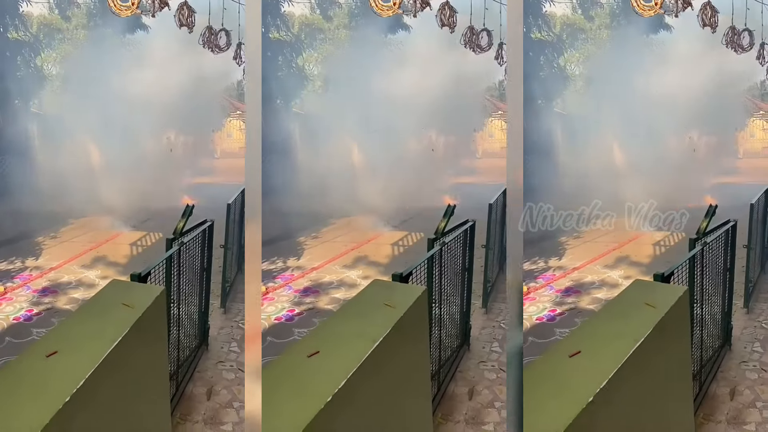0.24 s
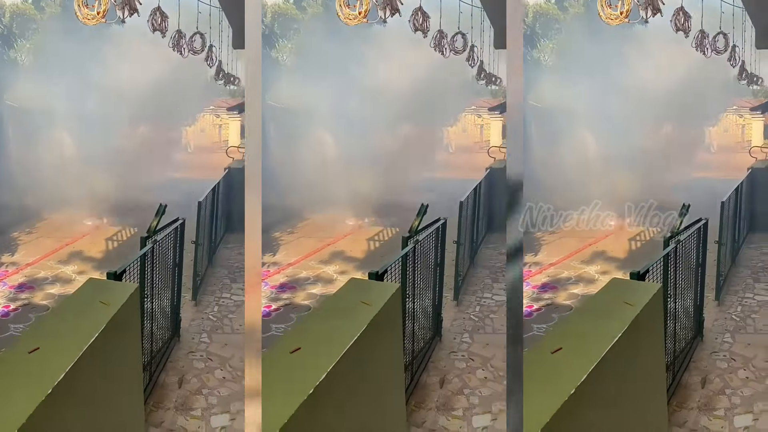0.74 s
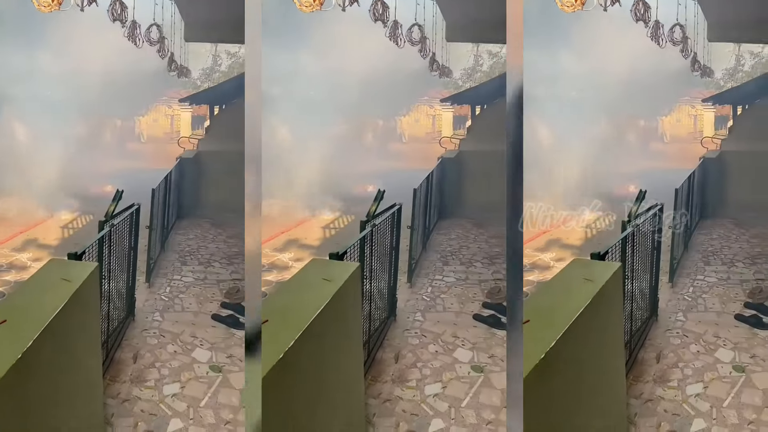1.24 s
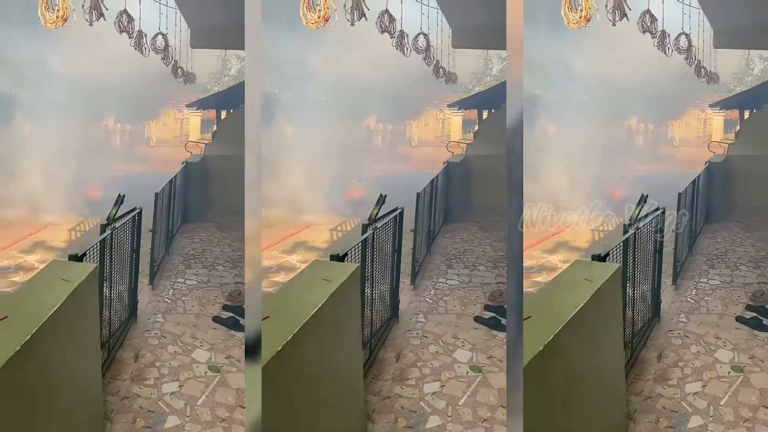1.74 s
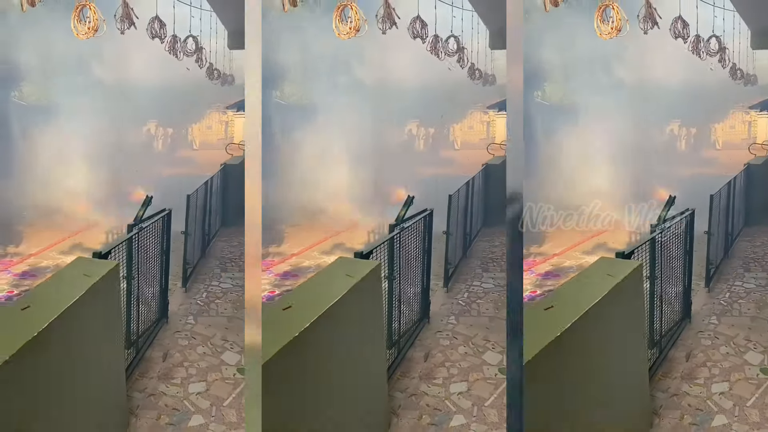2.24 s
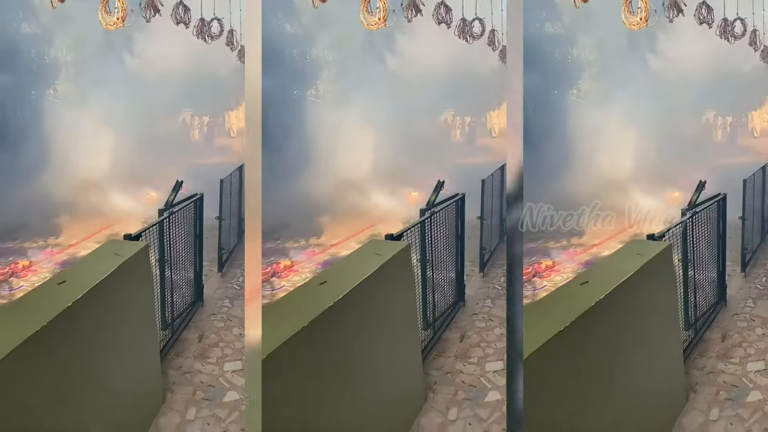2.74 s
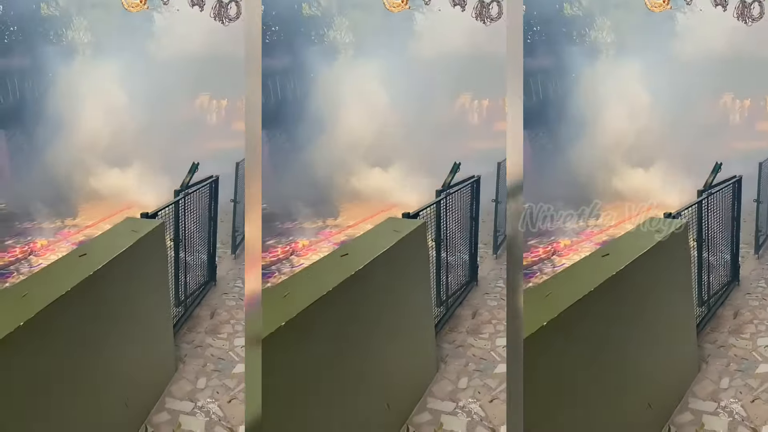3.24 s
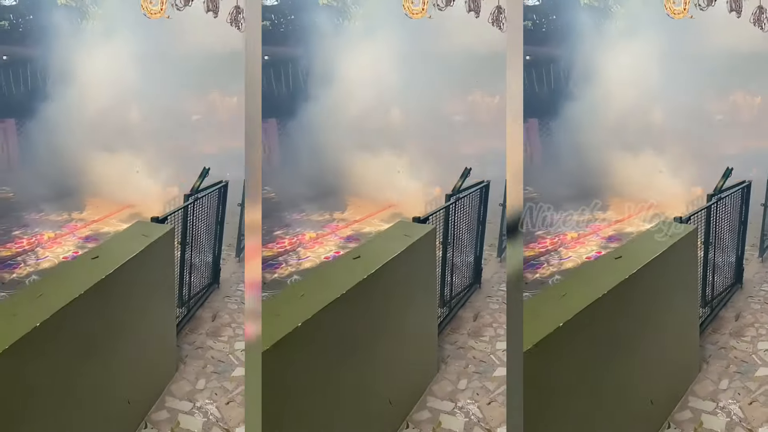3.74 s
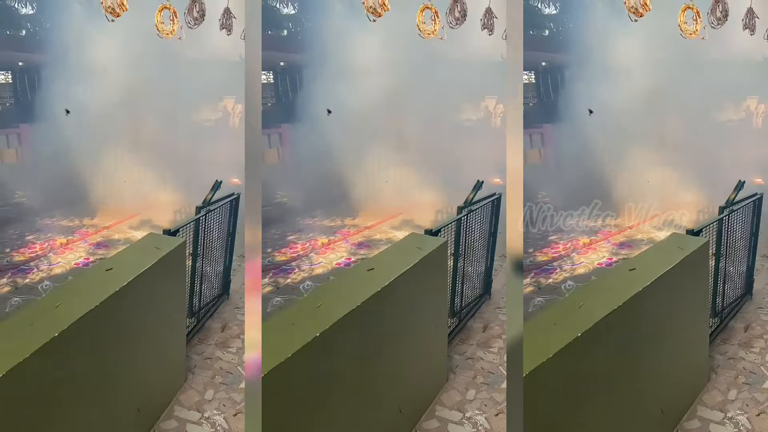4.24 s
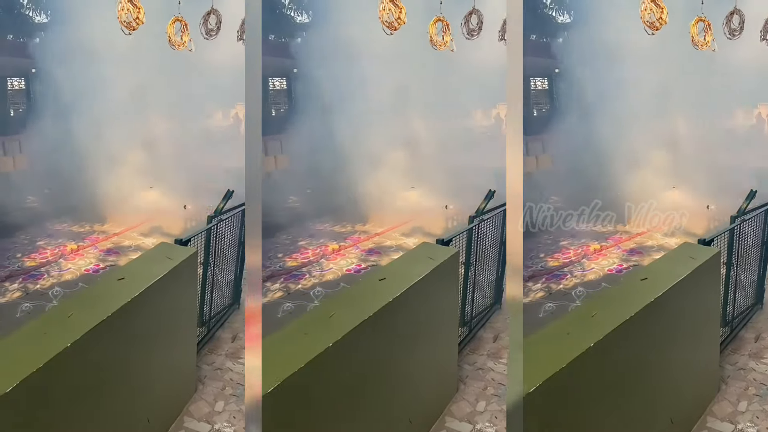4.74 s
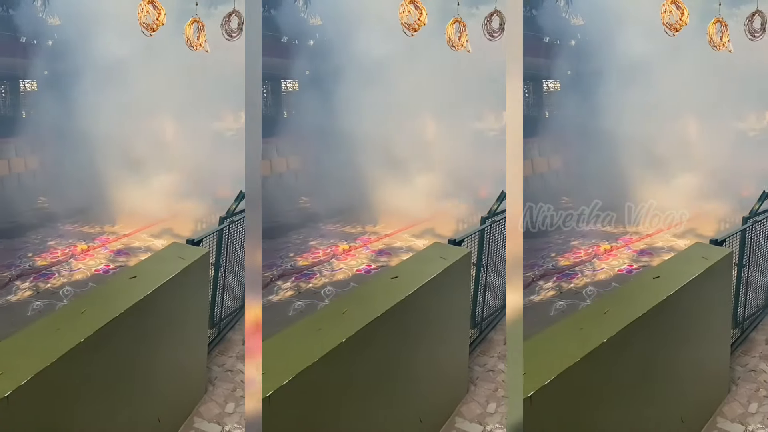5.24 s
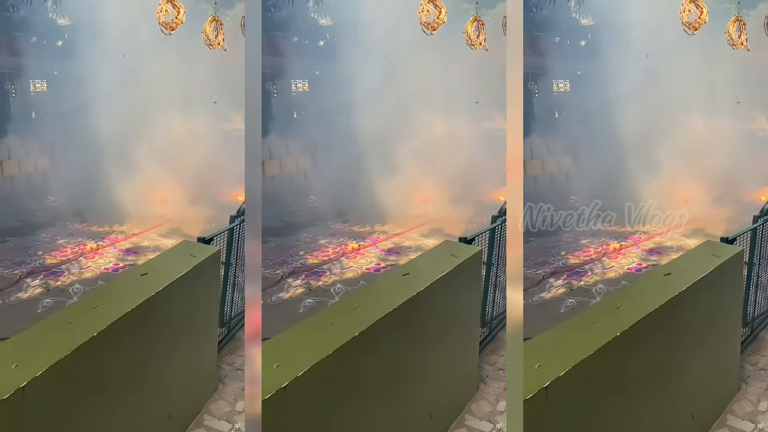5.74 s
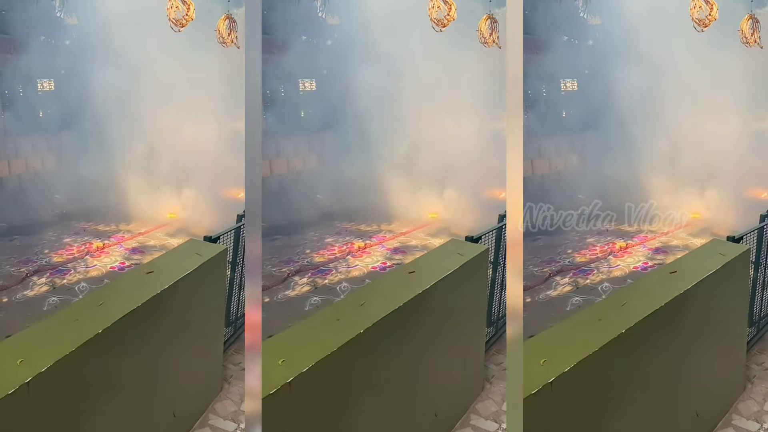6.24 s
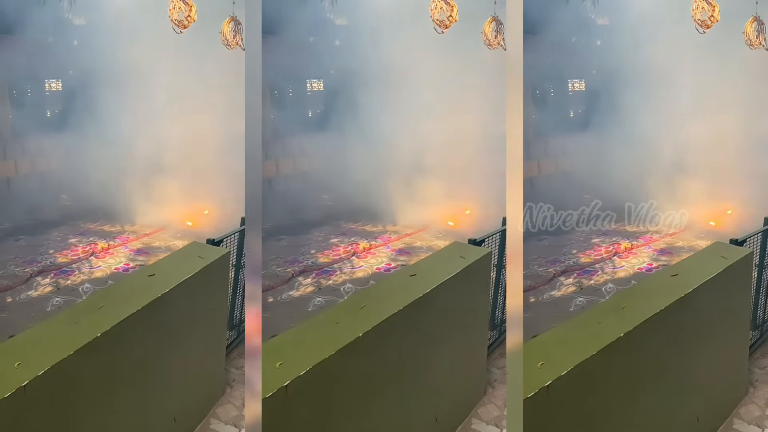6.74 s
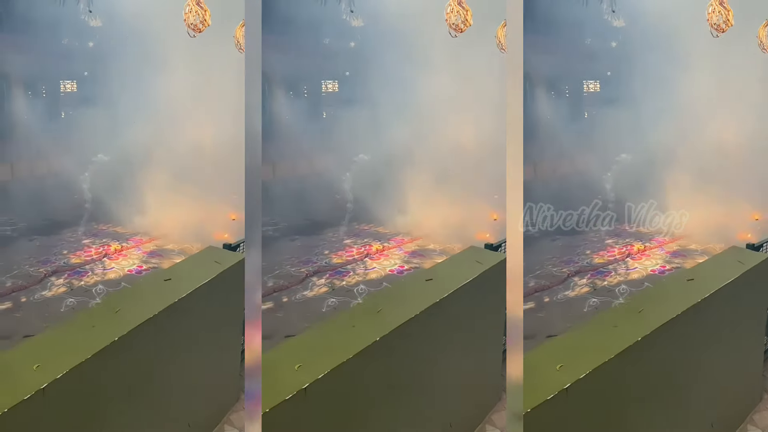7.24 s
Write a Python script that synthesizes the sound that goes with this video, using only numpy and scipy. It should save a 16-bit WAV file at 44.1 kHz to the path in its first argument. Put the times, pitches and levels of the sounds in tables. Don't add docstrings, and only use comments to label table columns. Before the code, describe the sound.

Rapid, irregular firecracker bangs fill an outdoor street from beginning to end. Loud near cracks stand out over smaller pops, with occasional low thumps from charges bursting on the ground. Quick wall reflections and a dense short reverberation fuse the gaps into a continuous rumbling roar with far echoes beneath. The handheld phone microphone squeezes the peaks and dulls the highest treble; the chain is still going when it ends.

```python
import sys
import numpy as np
from scipy import signal
from scipy.fft import rfft, irfft, next_fast_len
from scipy.io import wavfile
from scipy.ndimage import uniform_filter1d, minimum_filter1d

SR = 44100
rng = np.random.default_rng(int(sys.argv[2]) if len(sys.argv) > 2 else 0)


def rack_gain(trim_db):
    fader = np.asarray(trim_db, float)
    return 10 ** (fader / 20)


def output_pcm(signal):
    pcm = np.clip(np.atleast_2d(signal).T, -1, 1) * 32767
    wavfile.write(sys.argv[1], SR, np.round(pcm).astype(np.int16))


N = 329868

# start_s, blast_db, boom_db (rel crack), snap_db (rel crack)
BANGS = [(0.003, 8, 1.5, -10.5), (0.113, 9.5, -2.5, -8), (0.226, 10, -5, -10.5), (0.413, 6, 2, -18.5),
         (0.686, 7, -2, -19), (0.796, 9, -3.5, -9), (0.929, 9.5, 5, -8), (1.071, 9, 0.5, -8),
         (1.149, 9.5, 1.5, -10), (1.281, -0.5, 3, -1), (1.496, 11, -3.5, -20.5), (1.95, 6, 7, -3),
         (2.589, 9.5, -4, -12.5), (2.909, 6, 0, -9), (3.167, 11.5, -5.5, -12.5), (3.257, 12, -3, -15.5),
         (3.523, 2, -7, -12), (3.824, 7.5, -0.5, -7.5), (4.186, 7, 1.5, -10), (4.445, 7.5, -8.5, -12),
         (4.522, 5.5, 0.5, -8.5), (4.604, 11, -6, -17), (4.797, 8.5, 2, -8.5), (5.313, 7, -1, -11),
         (5.633, 4.5, 4.5, -5), (5.859, 4.5, -18.5, -8), (5.908, 5.5, 4, -6), (6.073, 6.5, 5, -19),
         (6.512, 5, -34.5, -15), (7.279, 2, 7, -12.5)]


def charges():
    # start_s, blast_db
    deep = [(0.016, 2), (0.343, 7), (0.363, -10.5), (1.485, 5), (1.574, 3), (1.68, 3), (1.865, 3),
            (2.025, 1.5), (2.364, -2.5), (2.452, 4), (2.625, -1), (5.506, -6.5), (3.203, 4), (3.407, 1),
            (3.755, 3.5), (3.899, 2.5), (4.091, -4.5), (4.639, 0.5), (4.839, 0), (5.021, -1.5), (5.076, 1),
            (5.191, -2), (6.026, 3), (6.098, 3), (6.26, 3), (6.446, 1), (6.521, -8.5), (6.662, -4),
            (7.036, -1.5), (3.54, 3)]
    # start_s, blast_db
    thin = [(0.377, 11), (0.431, 11), (0.581, 6.5), (1.084, 8), (1.293, 7.5), (1.326, 8.5), (1.478, 8.5),
            (1.511, 7), (1.737, 5), (1.78, 7.5), (1.858, 6.5), (1.88, 2.5), (1.979, 4), (2.299, 4.5),
            (2.332, 9.5), (2.429, 7), (2.598, 8), (2.833, 5.5), (3.0, 8.5), (3.237, -1.5), (4.849, 9),
            (5.154, 5.5), (5.971, 4), (6.105, 6), (6.234, 10), (6.467, 5.5), (6.542, 7.5), (7.03, 9),
            (7.295, 6.5), (7.445, 7.5)]
    # start_s, blast_db
    plain_a = [(0.316, 4.5), (1.213, 3), (1.361, 8), (1.631, 6.5), (1.833, 8), (2.147, 3), (2.181, 3.5),
               (2.531, 2.5), (2.665, 2.5), (2.689, 0.5), (3.636, 4), (4.073, 8.5), (4.23, 4.5), (4.724, 2),
               (4.904, -2), (4.944, 7), (5.063, 3), (5.14, 6.5), (5.742, -10.5), (5.951, 5.5), (6.123, 6.5),
               (6.326, 6), (6.437, 3), (6.593, 1), (6.652, 7), (6.908, 3), (6.999, 5.5), (7.051, 2),
               (7.091, 9), (7.153, 6)]
    # start_s, blast_db
    plain_b = [(0.168, 2), (1.428, 1.5), (1.698, 2.5), (1.727, -4), (2.012, 8.5), (2.243, 5), (2.279, 5.5),
               (2.741, 3), (2.94, 3), (3.012, 3.5), (3.49, 3.5), (3.932, 3.5), (3.953, 3.5), (4.023, 8),
               (4.169, -1), (4.285, 2.5), (4.92, 6.5), (5.047, 8), (5.085, 0), (5.371, 0.5), (5.671, 5.5),
               (5.728, 8.5), (6.189, 8), (6.285, 4.5), (6.505, 11.5), (6.609, 5.5), (6.736, 1.5),
               (6.768, 3.5), (7.141, 1.5), (7.368, 5)]
    # start_s, blast_db
    plain_c = [(0.263, 2.5), (0.483, 0.5), (0.855, 1.5), (0.957, -4), (1.275, 9.5), (1.663, 5.5),
               (4.261, 0.5), (2.107, 2.5), (2.701, 4.5), (2.8, 4), (3.057, 2.5), (3.217, 5), (3.293, 2.5),
               (3.387, 4), (3.537, -1), (3.728, 3), (4.34, 0), (4.362, 3), (4.596, 6), (4.788, 3),
               (4.879, 4), (5.225, 1.5), (5.472, 6), (5.552, -1.5), (6.035, 0.5), (6.636, -5.5),
               (6.809, 0.5), (6.854, 1.5), (6.948, 6), (7.429, -1.5)]
    # start_s, blast_db
    hidden = [(.909, -6.5), (1.097, 0.5), (1.761, 2), (2.058, -3), (2.201, 0), (2.29, -2.5), (2.355, 3.5),
              (2.954, 0.5), (3.182, -3.5), (3.272, 1.5), (3.362, -1), (3.675, -2), (3.749, -4.5),
              (4.111, 2.5), (4.377, -2.5), (4.437, -4), (4.933, -0.5), (5.258, -2.5), (5.465, -3.5),
              (5.484, 0.5), (6.169, -2), (6.427, -4), (6.701, 0), (7.016, 4), (7.099, -7.5), (7.22, -9.5),
              (7.326, -5.5), (7.467, 7.5)]
    # boom_db (rel), snap_db (rel)
    kinds = [
        (8, 2),
        (-7, -4.5),
        (4, -2),
        (4, -2.5),
        (3.5, -2),
        (1.5, -1),
    ]
    usual_boom_db, usual_snap_db, colour_spread_db = -1.5, -6.5, 2
    pair_gap_s, pair_gap_spread_s = .016, .016
    neighbour_db, neighbour_spread_db = -9.5, 4.5

    rows = [np.array(BANGS, float) - (0, 0, usual_boom_db, usual_snap_db)]
    for group, kind_db in zip((deep, thin, plain_a, plain_b, plain_c, hidden), kinds):
        spread_db = colour_spread_db * rng.standard_normal((len(group), 2))
        rows.append(np.hstack([group, kind_db + spread_db]))
    listed = np.vstack(rows)
    luck = rng.exponential(size=(len(listed), 2))
    paired = listed * (0.99, 0.9, 0.46, 0.42)
    paired[:, 0] += pair_gap_s + pair_gap_spread_s * luck[:, 0]
    paired[:, 1] += neighbour_db - neighbour_spread_db * luck[:, 1]
    return np.vstack([listed, paired[paired[:, 0] < N / SR]]).T


def shares(hz):
    thump_hz, boom_hz, snap_hz = 157, 624, 2420
    under = [1 / (1 + (hz / edge_hz) ** 4) for edge_hz in (thump_hz, boom_hz, snap_hz)]
    return np.diff([0 * hz, *under, 0 * hz + 1], axis=0)


def band_sizes(blast_db, boom_db, snap_db):
    return [rack_gain(blast_db + tilt_db) for tilt_db in (boom_db, boom_db, 0, snap_db)]


def scatter(at_s, size, length):
    line = np.zeros(length)
    np.add.at(line, np.clip(at_s * SR, 0, N - 1).astype(int), size)
    return rfft(line)


def blasts(start_s, sizes, length, hz):
    # direct_db (past the wall), slap_db (off the house front)
    front = [
        (1.5, -8),
        (2.5, -8),
        (5, -6),
        (2.5, -8),
    ]
    tear_s, tear_db = .0028, -5
    slap_delay_s, slap_spread_s = .014, .0008
    shade_db = -2.2

    chance = rng.standard_normal((len(start_s), 3, 6))
    is_shred = np.arange(6) > 0
    shred_s = start_s[:, None] + tear_s * np.abs(chance[:, 0]) * is_shred
    shred = np.where(is_shred, rack_gain(tear_db) * chance[:, 1], 1.)
    shred = shred / np.sqrt(np.sum(shred ** 2, axis=1, keepdims=True))
    whole = 1. * ~is_shred
    slap_s = shred_s + slap_delay_s + slap_spread_s * chance[:, 2]
    seen = rack_gain(shade_db * (np.arange(len(start_s)) >= len(BANGS)))[:, None]

    direct = 0
    bands = zip(shares(hz), sizes, (whole, whole, shred, shred), front)
    for share, size, parts, (direct_db, slap_db) in bands:
        burst = parts * size[:, None]
        past_wall = rack_gain(direct_db) * scatter(shred_s, burst * seen, length)
        slap = rack_gain(slap_db) * scatter(slap_s, burst, length)
        direct = direct + share * (past_wall + slap)
    return direct


def ring(t60_s, db, uneven, length):
    early_db, early_t60_s, rise_s = 6, 0.051, .008
    t = np.arange(SR) / SR
    decay = rack_gain(-60 * t / t60_s) + rack_gain(early_db - 60 * t / early_t60_s)
    wash = rng.standard_normal(SR) * uneven * decay * (1 - np.exp(-t / rise_s))
    return rfft(wash * rack_gain(db) / np.sqrt(np.sum(wash ** 2)), length)


def street(start_s, sizes, length, hz):
    # ring_db, t60_s
    ring_bands = [
        (-1.5, 0.32),
        (4.5, 0.54),
        (7.5, 0.52),
        (7.5, 0.52),
    ]
    places, echo_spread_db = 4, 2
    lump_db, lump_hz = 2.5, 170

    walls = np.repeat(rng.standard_normal((places, SR // 98)), 98, axis=1)
    uneven = rack_gain(echo_spread_db * walls)
    patch_hz = lump_hz * np.arange(150)
    lumps = [rack_gain(np.interp(hz, patch_hz, lump_db * row)) for row in rng.standard_normal((places, 150))]
    lumps = lumps / np.sqrt(np.mean(np.square(lumps), axis=0))

    both, apart = 0, 0
    for share, size, (ring_db, t60_s) in zip(shares(hz), sizes, ring_bands):
        for place in range(places):
            clicks = scatter(start_s[place::places], size[place::places], length)
            blast = share * lumps[place] * clicks
            both = both + blast * ring(t60_s, ring_db, uneven[place], length)
            apart = apart + blast * ring(t60_s, ring_db, uneven[place], length)
    return both, apart


def colour(table, hz):
    f, db = np.transpose(table)
    gain = rack_gain(np.interp(np.log(hz + 1), np.log(f), db))
    return gain / np.sqrt(np.mean(gain[hz < 6000] ** 2))


def scene():
    # freq_hz, level_db (per Hz)
    sum_spectrum = [(15, -40.5), (25, -20), (55, -2), (140, -2), (300, -5.5), (450, -2), (1290, -8.5),
                    (3660, -14), (5010, -20.5), (5850, -20), (7200, -25), (12000, -32.5), (13000, -58),
                    (22000, -120)]
    # freq_hz, level_db (per Hz)
    apart_spectrum = [(15, -50), (25, -19), (90, -11), (182, -6.5), (331, -9), (516, -1.5), (894, -1),
                      (1860, -9.5), (2670, -5.5), (4060, -15), (5010, -13), (10700, -19), (11800, -26.5),
                      (12800, -53), (16700, -83), (22000, -120)]
    # freq_hz, phase_rad
    port_turn = [
        (200, 1.55),
        (600, 1.2),
        (1200, 0.39),
        (2500, 1.45),
        (5000, 1.5),
    ]
    both_db, apart_db, far_db = 7, 3.5, -32.5

    length = next_fast_len(N + SR)
    hz = np.arange(length // 2 + 1) * SR / length
    start_s, blast_db, boom_db, snap_db = charges()
    sizes = band_sizes(blast_db, boom_db, snap_db)
    direct = blasts(start_s, sizes, length, hz)
    both, apart = street(start_s, sizes, length, hz)
    far = rfft(rack_gain(far_db) * rng.standard_normal((2, length)))
    mid = rack_gain(both_db) * colour(sum_spectrum, hz) * (direct + both + far[0])
    lead = np.exp(1j * np.interp(hz, *np.transpose(port_turn)))
    side = rack_gain(apart_db) * colour(apart_spectrum, hz) * (direct * lead + apart + far[1])
    return irfft(np.array([mid + side, mid - side]), length)[:, :N]


def bass_lag(x):
    lag_turns = 1.38
    hz = np.arange(N // 2 + 1) * SR / N
    turns = lag_turns * (hz / 1500 - np.log((hz + 60) / 2000))
    return irfft(rfft(x) * np.exp(2j * np.pi * turns), N)


def limiter(x):
    limit_db, look_ahead_s = -.2, .001
    span = int(look_ahead_s * SR) + 1
    gain = np.minimum(1, rack_gain(limit_db) / (np.abs(x).max(axis=0) + 1e-9))
    return x * uniform_filter1d(minimum_filter1d(gain, 2 * span), span)


def holes(x, empty, hunger):
    hz, s, z = signal.stft(x, SR, "cosine", 2048, 1024)
    luck = rng.standard_normal((len(hz) // 12 + 1, len(s)))
    luck = uniform_filter1d(luck, size=2, axis=1)
    rank = luck.argsort(axis=1).argsort(axis=1) / len(s)
    rank = np.repeat(rank, 12, axis=0)[:len(hz)]
    share = np.interp(hz // 258 * 258, *np.transpose(empty))[:, None]
    keep = rank >= share ** (1 / np.interp(s, *np.transpose(hunger)))
    return signal.istft(z * keep, SR, "cosine", 2048, 1024)[1][:N]


def thin_bands(x):
    # freq_hz, share (0-1)
    sum_empty = [(4300, 0), (4900, .45), (5600, .2), (6200, .35), (6700, .8), (7300, 1)]
    # freq_hz, share (0-1)
    apart_empty = [(3400, 0), (4100, .12), (4800, 0), (7500, 0), (9500, .18), (11200, .35), (12000, .9),
                   (12400, 1)]
    # freq_hz, share (0-1)
    top_empty = [(7000, .45), (10000, .55), (10900, .4), (11500, .2), (12400, .6)]
    # time_s, factor (on its empty share)
    sum_hunger = [(0, 1), (.35, 2), (.6, 1), (1.5, .6), (3, .8), (4.2, .8), (5.1, 1.8), (5.5, 1), (6.1, 2),
                  (6.4, 1), (6.8, 2), (7.2, 1)]
    # start_s, length_s, level_db
    top_kept = [(0.089, 0.049, 0), (0.193, 0.071, -4), (0.555, 0.047, 2), (0.663, .038, -2),
                (0.788, 0.023, 6.5), (0.897, 0.059, 0), (1.062, 0.016, -12), (1.259, 0.031, -4),
                (1.916, 0.043, -5), (2.555, 0.048, 6), (2.893, 0.032, 0.6), (3.13, 0.063, -1),
                (3.461, 0.046, 4), (3.796, 0.04, -5), (3.879, 0.026, 0.5), (4.694, 0.05, 8.5),
                (4.994, 0.042, -4), (5.285, 0.038, -3), (5.446, 0.034, 7), (5.625, 0.011, -7),
                (5.804, 0.14, 1), (6.396, 0.086, -5), (7.237, 0.075, 6), (7.334, 0.069, 0),
                (7.378, 0.085, -5)]
    # start_s, length_s, level_db
    tip_kept = [
        (4.569, 0.036, -1),
        (6.101, 0.09, 8.5),
        (6.16, 0.11, 6),
        (6.242, 0.067, -1),
        (6.299, 0.084, 8),
        (6.37, 0.11, 1),
        (6.457, 0.14, 3),
        (7.192, 0.066, -4),
        (7.3, 0.044, -1.5),
    ]
    top_from_hz, tip_from_hz, top_hz = 7100, 10220, 11700

    hz, t = np.arange(N // 2 + 1) * SR / N, np.arange(N) / SR
    mid = (x[0] + x[1]) / 2
    side = holes((x[0] - x[1]) / 2, apart_empty, [(0, 0.62)])
    kept = holes(mid, sum_empty, sum_hunger)
    top = rfft(holes(mid, top_empty, [(0, 0.67)])) * (hz < top_hz)
    for low_hz, spells in ((top_from_hz, top_kept), (tip_from_hz, tip_kept)):
        window = np.zeros(N)
        for start_s, length_s, db in spells:
            part = slice(int(start_s * SR), int((start_s + length_s) * SR))
            window[part] += rack_gain(db) * np.sin(np.pi * (t[part] - start_s) / length_s) ** 2
        kept += window * irfft(top * (hz > low_hz), N)
    return np.array([kept + side, kept - side])


def top_cut(x):
    return signal.sosfilt(signal.butter(12, 12960, fs=SR, output="sos"), x)


def record(dry):
    mix = thin_bands(limiter(bass_lag(dry)))
    return top_cut(mix)


dry = scene()
out = record(dry)
output_pcm(out)
```